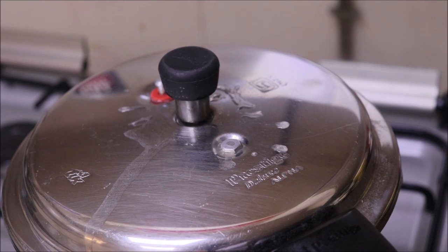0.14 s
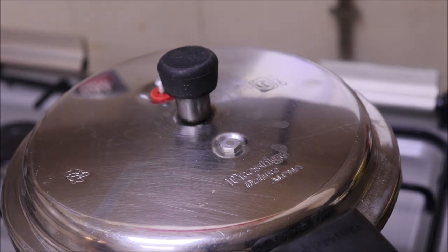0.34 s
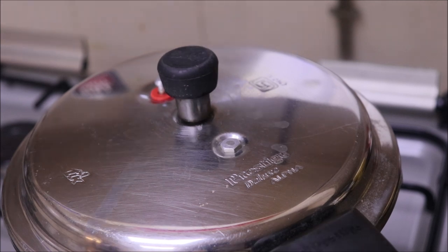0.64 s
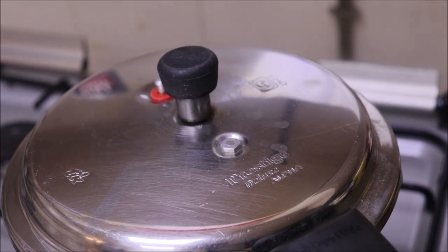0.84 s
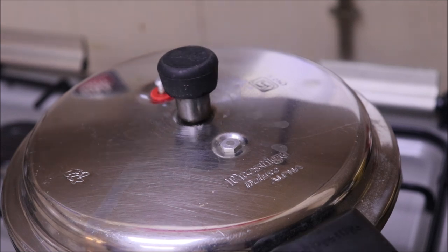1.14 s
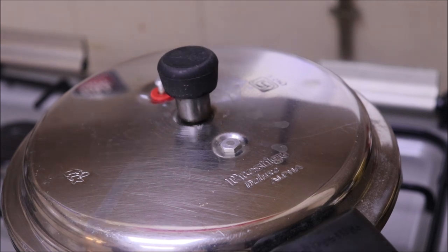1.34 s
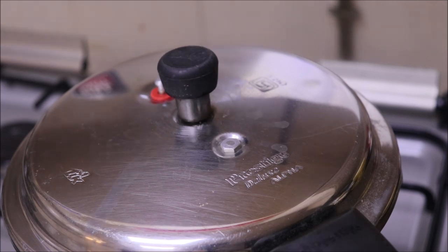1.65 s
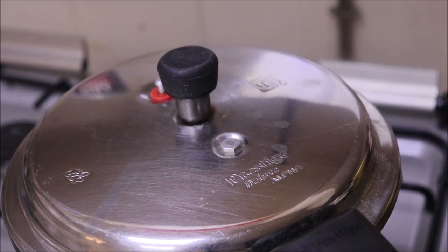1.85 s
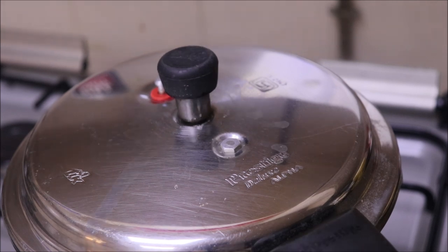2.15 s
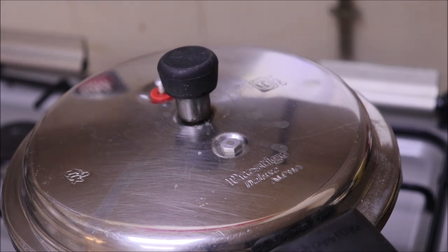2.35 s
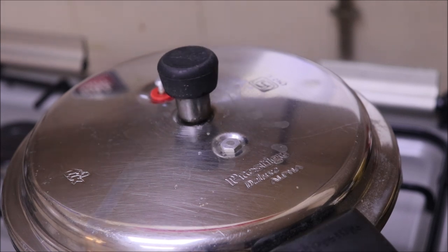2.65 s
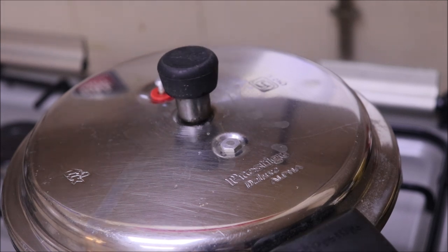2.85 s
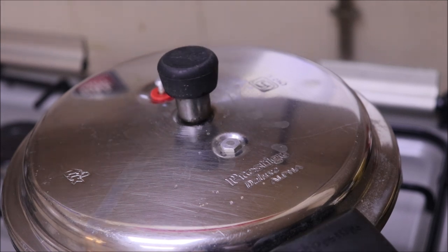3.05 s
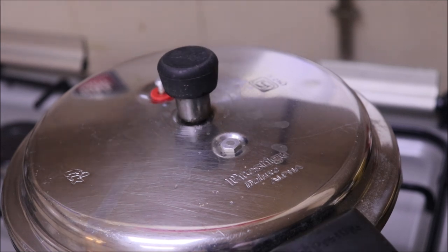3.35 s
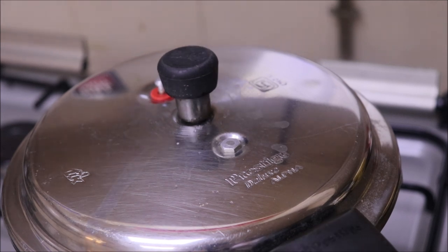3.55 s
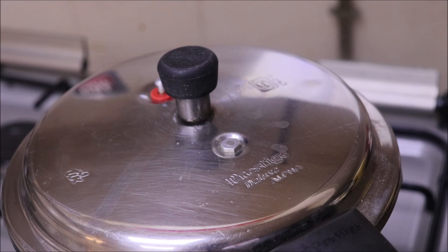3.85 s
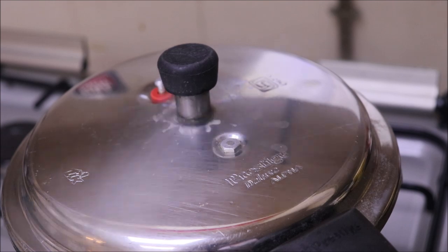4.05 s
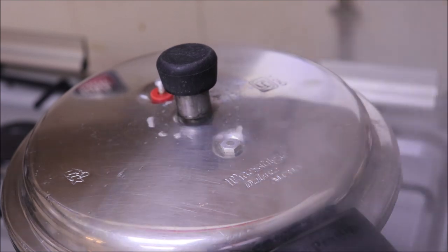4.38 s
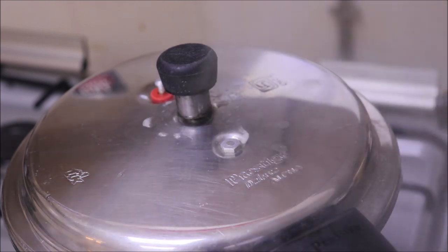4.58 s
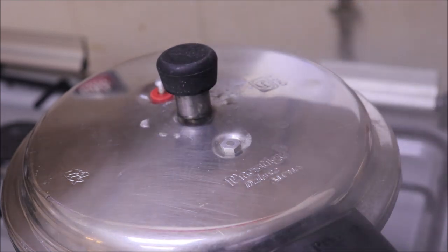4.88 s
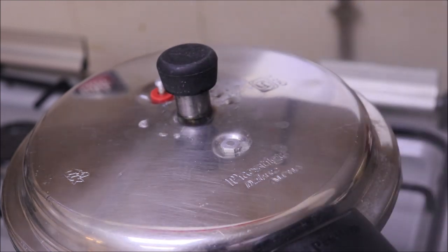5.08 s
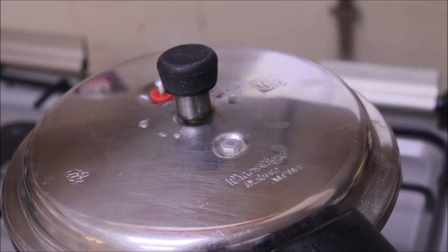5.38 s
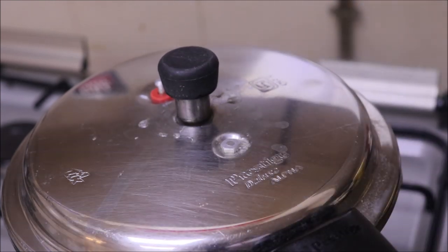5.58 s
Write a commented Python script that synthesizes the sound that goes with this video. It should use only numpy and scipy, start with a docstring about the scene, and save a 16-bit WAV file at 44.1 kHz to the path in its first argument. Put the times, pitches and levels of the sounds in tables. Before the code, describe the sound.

A gas burner rumbles quietly under a pressure cooker, with a faint hum and a thin seep of steam, heard close up in stereo in a small kitchen. At about 0.4 seconds a sharp, high hiss breaks out from the valve. It flutters rapidly as the weight rocks, lightly until 1.3 seconds, again from 2.2, and most strongly between 3 and 4 seconds, with brief swells. At 4 seconds the weight lifts with a small knock and a soft puff, water sputters, and the hiss opens into a much louder, broader jet that covers the burner. From about 4.3 seconds a breathy, high whistle wavers inside the rush, drifting upward. Near 5.5 seconds the hiss surges once more and the weight drops back with two quick metallic knocks that briefly ring the lid. The steam dies away at once.

```python
"""A small kitchen, with a stereo microphone close to a pressure cooker on a gas stove.
Over the rumble of the burner, steam first seeps, then hisses hard past the rocking weight valve.
The weight lifts, the vent spits and blows a full, half-whistling jet, then the weight drops back
and rings the lid. The jet is so loud that gain control pushes the burner away until it ends."""
import sys
import numpy as np
from scipy import signal
from scipy.fft import rfft, irfft
from scipy.io import wavfile
from scipy.ndimage import uniform_filter1d

SR = 44100
rng = np.random.default_rng(int(sys.argv[2]) if len(sys.argv) > 2 else 0)


def dump(signal):
    """Clip the signal to [-1, 1] and save it as 16-bit WAV at the path in sys.argv[1]."""
    limited = np.clip(np.atleast_2d(signal).T, -1, 1)
    pcm = np.round(limited * 32767).astype(np.int16)
    wavfile.write(sys.argv[1], SR, pcm)


N = 252252
TIME, FREQ = np.arange(N) / SR, np.fft.rfftfreq(N, 1 / SR)
# the hiss breaks out; the weight lifts, drops and sits again
HISS_S, LIFT_S, DROP_S, SEAT_S = 0.3912, 3.985, 5.478, 5.535


def gain_of(db):
    """Decibels as a factor."""
    return 10 ** (np.asarray(db) / 20)


def unit_rms(x):
    """Scales x to rms 1."""
    return x / np.sqrt(np.mean(x ** 2) + 1e-20)


def curve(points, hz=FREQ):
    """Interpolates a table along log frequency."""
    point_hz, value = np.transpose(points)
    return np.interp(np.log(hz + 1), np.log(point_hz + 1), value)


def coloured(x, colour, modes=()):
    """Passes x through a broad colour with resonances on it; comes out at rms 1."""
    lift_db = sum(db / (1 + (2 * (FREQ - hz) / width) ** 2) for hz, width, db in modes)
    return unit_rms(irfft(rfft(x) * gain_of(curve(colour) + lift_db), N))


def turbulence(count=3):
    """Unrelated eddies: by default the core of a plume and its two flanks."""
    return rng.standard_normal((count, N))


def wander(rate_hz):
    """Random drift of rms 1, up to about the given rate."""
    return unit_rms(irfft(rfft(rng.standard_normal(N)) / (1 + (FREQ / rate_hz) ** 4), N))


def droplets(per_s, spread_db):
    """Sparse clicks of uneven size."""
    size = gain_of(spread_db * np.minimum(rng.exponential(1, N), 4))
    return unit_rms(size * rng.choice([-1, 1], N) * (rng.random(N) < per_s / SR))


def swell(peak_s, db, rise_s, fall_s):
    """A gain that rises to one peak and falls away."""
    away = np.maximum((peak_s - TIME) / rise_s, (TIME - peak_s) / fall_s)
    return gain_of(db) * np.exp(-away ** 1.8)


def release(start_s, db_per_s):
    """A gain that holds until start_s and then fades evenly."""
    return gain_of(-db_per_s * np.maximum(TIME - start_s, 0))


# rumble of the burner under the pot: freq_hz, relative_db
BURNER_COLOUR = [(15, -24), (35, -8), (85, -2.5), (170, -5), (215, -2.5), (268, 0), (315, -8), (400, -4.5),
                 (600, -7), (750, -5.5), (1100, -5), (1500, 0.5), (1800, -12), (4000, -52)]
# mains hum in the kitchen, centred between the channels: pitch_hz, level_db
MAINS_HUM = [(100.5, -74), (199.6, -64)]
def stove(burner_db=-51, width=0.37, flicker_db=0.5):
    """The flame and the boiling pot rumble steadily over a faint hum."""
    mid, side = coloured(turbulence(count=2), BURNER_COLOUR)
    flame = (mid + width * np.array([side, -side])) * gain_of(burner_db + flicker_db * wander(12))
    hum = sum(gain_of(db) * np.sqrt(2) * np.sin(2 * np.pi * hz * TIME + 0.9 * wander(11))
              for hz, db in MAINS_HUM)
    return flame + hum


# the seeping valve from close by: freq_hz, relative_db
SEEP_COLOUR = [(400, -27), (2000, -6), (3000, -3), (5000, -3), (6000, -1), (7500, -2), (9500, -6),
               (10500, -1.5), (12000, -8), (14000, -15), (15000, -9.5)]
def seep(level_db=-45.5):
    """A faint, steady escape of steam, there before the valve starts to hiss."""
    return coloured(turbulence(), SEEP_COLOUR) * gain_of(level_db)


# the hiss at the gap under the weight: freq_hz, relative_db
HISS_COLOUR = [(133, -49), (400, -22), (800, -17.5), (1300, -11.5), (2000, -6.5), (2900, -3.5), (4600, -2),
               (6000, -5.5), (8200, 0.0), (9300, -1.9), (10900, -3), (12700, -12), (14700, -11.5),
               (15500, -16)]
# resonances of the gap and the hollow weight: centre_hz, width_hz, lift_db
GAP_MODES = [(3080, 100, 1.5), (3390, 31, 4.5), (3970, 94, 0.5), (5070, 510, 2), (5370, 86, 4),
             (5850, 820, 7.5), (6340, 625, 7.5), (6340, 73, -5.5), (6760, 210, 5), (7120, 33, 9),
             (7310, 114, 3.5), (7400, 55, 3.0), (7700, 107, 3.5), (7870, 430, 2.5), (10300, 240, 3.5),
             (10900, 55, 3), (11200, 35, -6), (11430, 282, 2.7)]
# surges as the gap opens and the weight shifts, lifts and drops: peak_s, level_db, rise_s, fall_s
SURGES = [(0.394, -26.5, 0.002, 0.015), (0.545, -28, 0.025, 0.025), (1.63, -33.5, 0.1, 0.15),
          (2.95, -25.5, 0.094, 0.2), (3.86, -26, 0.049, 0.088), (4.012, -18.5, 0.014, 0.16),
          (4.14, -11.5, 0.065, 0.1), (5.45, -3, 0.091, 0.036), (5.48, 1.5, 0.017, 0.02)]
def hiss(level_db=-26.0, growth_db_per_s=0.07, attack_s=0.0017, spurt_db=-7, wet=0.21):
    """Steam squeezes past the weight with fine droplets, swelling each time the weight rocks."""
    t = TIME - HISS_S
    strength = gain_of(level_db + growth_db_per_s * t) * np.clip(t / attack_s, 0, 1)
    strength *= release(SEAT_S, db_per_s=118)  # the pressure is spent
    tilt = rocking()
    wet_steam = turbulence() + wet * droplets(per_s=430, spread_db=-0.5)
    steady = coloured(wet_steam, HISS_COLOUR, GAP_MODES) * strength * gain_of(0.5 * tilt)
    # a spurt mostly drives the resonances of the gap, and they follow the tilt most strongly
    spurt_power = (strength * gain_of(spurt_db)) ** 2 + sum(swell(*row) ** 2 for row in SURGES)
    spurt_colour = [(hz, db - 4 * abs(np.log2(hz / 6800))) for hz, db in HISS_COLOUR]
    spurts = coloured(turbulence(), spurt_colour, GAP_MODES) * np.sqrt(spurt_power)
    return steady + spurts * gain_of(5.0 * tilt)


# the low body of a puff, close up: freq_hz, relative_db
PUFF_COLOUR = [(20, -22), (80, -6), (250, -3), (400, -5), (630, 3.5), (780, -25), (2000, -45)]
# puffs at the valve: peak_s, level_db, rise_s, fall_s
PUFFS = [(0.4, -52, 0.0065, 0.046), (3.99, -43, 0.0087, 0.026), (4.12, -51, 0.06, 0.09)]
def puffs():
    """Steam puffs from under the weight as the gap opens and as the weight lifts."""
    return coloured(turbulence(), PUFF_COLOUR) * sum(swell(*row) for row in PUFFS)


# bouts of the weight rocking on its seat: start_s, length_s, strength (0-1)
ROCKING_BOUTS = [(0.522, 0.77, 0.4), (2.22, 0.56, 0.6), (3.013, 0.99, 0.87)]
def rocking(rock_hz=13.6, ease_s=0.06):
    """Tilt of the weight: it rocks at its own steady rate over a slight, irregular wobble."""
    tilt = 0.27 * wander(rate_hz=8.8)
    for start_s, length_s, strength in ROCKING_BOUTS:
        t = TIME - start_s
        bout = np.clip(np.minimum(t, length_s - t) / ease_s, 0, 1)
        tilt += strength * bout * np.sin(2 * np.pi * rock_hz * t)
    return tilt


# the weight striking the vent pipe: start_s, level_db
KNOCKS = [(3.982, -45), (3.997, -41.5), (5.473, -31), (5.521, -26.5), (5.585, -45)]
# the ring of the lid: pitch_hz, relative_db, t60_s
LID_MODES = [(360, -9, 0.073), (540, -7, .06), (585, 1, .1), (618, 1, 0.18), (680, -3, 0.069),
             (1005, -3, .06), (1670, -3, 0.13), (1771, -12, .05)]
def weight_knocks(attack_s=0.0007, chatter_db=-63.5):
    """The weight knocks as it lifts and lands, then chatters on its seat; each blow rings the lid."""
    t = TIME[:SR // 2]
    ring = sum(gain_of(db - 60 * t / t60) * np.sin(2 * np.pi * hz * t) for hz, db, t60 in LID_MODES)
    ring *= 1 - np.exp(-t / attack_s)
    settling = (TIME > SEAT_S) * gain_of(chatter_db) * release(SEAT_S, db_per_s=82)
    blows = droplets(per_s=424, spread_db=1.5) * settling
    for start_s, db in KNOCKS:
        blows[round(start_s * SR)] += gain_of(db)
    return signal.fftconvolve(blows, ring)[:N]


def jet_flow(crack_db=-29, full_db=-2.5, open_s=0.23, creep_db_per_s=2):
    """The flow grows from a crack to full, creeps up while the weight floats and shuts as it drops."""
    t = TIME - LIFT_S
    db = np.interp(t, [0, open_s], [crack_db, full_db]) + creep_db_per_s * np.maximum(t - open_s, 0)
    return (t > 0) * gain_of(db) * release(DROP_S, db_per_s=560)


# the open vent from close by: freq_hz, relative_db
JET_COLOUR = [(133, -48), (400, -39), (700, -31), (1100, -22), (1700, -13.5), (2700, -4), (3800, -0.8),
              (5000, -1.3), (7800, -2.5), (8900, -4), (10000, -1.5), (11700, -1), (13000, -8), (15500, -12)]
# resonances of the gap and the lifted weight: centre_hz, width_hz, lift_db
JET_MODES = [(2380, 51, 1.8), (3860, 36, 2.4), (5430, 47, 2.5), (5360, 40, 2.5), (6000, 390, 2.8),
             (6300, 69, 2.3), (7032, 40, 3), (7480, 94, 4.2), (7500, 71, 3), (7850, 80, 4.5), (8000, 74, 3),
             (8200, 630, 2.6), (8400, 67, 2.5), (9109, 160, 2.6), (9700, 88, 3.2)]
def jet(flutter_db=0.63, wet=0.19):
    """Wet steam rushes from the wide open vent, broader and far louder than the hiss."""
    wet_steam = turbulence() + wet * droplets(per_s=1100, spread_db=3.0)
    rush = coloured(wet_steam, JET_COLOUR, JET_MODES)
    return rush * jet_flow() * gain_of(flutter_db * wander(rate_hz=71))


# water spitting at the vent: freq_hz, relative_db
SPRAY_COLOUR = [(100, -41), (400, -14), (900, -7.5), (1900, 2), (3200, 7.5), (5000, 5), (10000, -25)]
# its single burst: peak_s, level_db, rise_s, fall_s
SPRAY_SWELL = (4.105, -16, 0.09, 0.08)
def spray():
    """Condensed water sputters out as the vent opens."""
    water = droplets(per_s=600, spread_db=2)
    return coloured(turbulence() + water, SPRAY_COLOUR) * swell(*SPRAY_SWELL)


# the whistle wavering as the lifted weight sways: time_s, pitch_hz, level_db (relative to the jet)
WHISTLE_PATH = [(4.3, 3130, -15), (4.43, 3550, -26), (4.53, 3810, -11), (4.63, 3870, -25),
                (4.82, 3520, -14), (4.92, 3810, -23), (5.15, 4060, -18), (5.33, 3950, -17),
                (5.43, 4000, -32)]
def whistle(width_hz=170, waver_hz=35):
    """The jet drives eddies at the lip of the weight, which gather in a narrow, breathy band."""
    time_s, hz, db = np.transpose(WHISTLE_PATH)
    pitch_hz = np.interp(TIME, time_s, hz) + waver_hz * wander(rate_hz=20.9)
    cycles = np.cumsum(pitch_hz) / SR
    eddies = np.array([wander(width_hz) + 1j * wander(width_hz) for _ in range(3)])
    band = unit_rms((eddies * np.exp(2j * np.pi * cycles)).real)
    return band * jet_flow() * gain_of(np.interp(TIME, time_s, db))


def swirled(plume, depth_db, patch_s, patch_hz):
    """The plume sways, so patches of its spectrum swell and fade."""
    spectra = signal.stft(plume, nperseg=512)[2]
    hop_s, bin_hz = 256 / SR, SR / 512
    patches = rng.standard_normal(spectra.shape[1:])
    patches = uniform_filter1d(patches, 1 + int(patch_hz / bin_hz), axis=0)
    patches = uniform_filter1d(patches, 1 + int(patch_s / hop_s), axis=1)
    return signal.istft(spectra * gain_of(depth_db * unit_rms(patches)), nperseg=512)[1][:, :N]


# reverberation of the small kitchen: freq_hz, t60_s
KITCHEN_DECAY = [(200, 0.63), (2000, 0.5), (6500, 0.49), (10000, 0.41), (15000, .25)]
def kitchen(early_db=7.5, early_s=0.021):
    """Echoes at the microphone: strong early ones off lid and wall, then a tail that dies by band."""
    t = np.arange(SR // 2) / SR
    echoes = rng.standard_normal((2, len(t))) * (1 + gain_of(early_db) * np.exp(-t / early_s))
    hz, frame_s, spectra = signal.stft(echoes, SR, nperseg=256)
    spectra *= gain_of(-60 * frame_s / curve(KITCHEN_DECAY, hz)[:, None])
    band_energy = (abs(spectra) ** 2).sum(2, keepdims=True)
    spectra /= np.sqrt(uniform_filter1d(band_energy, size=3, axis=1))
    response = signal.istft(spectra, SR, nperseg=256)[1]
    return response / np.linalg.norm(response, axis=1, keepdims=True)


# power reaching the microphone straight from the valve: freq_hz, share (0-1)
LEAK_DIRECT = [(300, 0.77), (1500, 0.62), (2300, 0.56), (3000, 0.57), (5900, 0.55), (7000, 0.28),
               (8000, 0.6), (9400, 0.25), (15000, 0.06)]
JET_DIRECT = [(300, 1), (1500, 0.71), (2300, 0.46), (3000, 0.71), (5600, 0.46), (7100, 0.21), (8000, 0.22),
              (9000, 0.39), (10000, 0.4), (15000, 0.36)]
# phase between the two microphone ports: freq_hz, left_lead_rad
LEAK_PHASE = [(1500, 0), (5500, .2), (8500, .9), (10000, 1.9), (15000, 2.2)]
JET_PHASE = [(1500, 0), (5500, .2), (8500, .8), (11500, .7), (15000, 1.1)]
# balance between the ports: freq_hz, left_minus_right_db
PORT_BALANCE = [(50, -3), (700, 1), (1500, -1), (2400, -4.5), (3100, -2.5), (4500, -1.8), (8000, -2),
                (12000, -0.5), (15000, 1.2)]
def at_microphone(plume, room, direct, phase):
    """The core of the plume reaches both ports straight; its flanks arrive by way of the room."""
    share = np.clip(curve(direct), .02, .98)
    side = np.array([[.5], [-.5]])
    straight = rfft(plume[0]) * np.exp(1j * side * curve(phase))
    echoes = rfft(signal.fftconvolve(plume[1:], room, axes=1)[:, :N])
    ports = np.sqrt(share) * straight + np.sqrt(1 - share) * echoes
    return irfft(ports * gain_of(side * curve(PORT_BALANCE)), N)


def scene():
    """The leaking valve, the open vent and the weight sound in one kitchen, over the stove."""
    room = kitchen()
    leak = (seep() + hiss()) * gain_of(0.53 * wander(rate_hz=65))  # a slight, fast flutter
    leak = swirled(leak, depth_db=0.88, patch_s=0.07, patch_hz=1100)
    vent = swirled(jet() + spray() + whistle(), depth_db=0.87, patch_s=0.091, patch_hz=500)
    vent += weight_knocks() + puffs()
    return (at_microphone(leak, room, LEAK_DIRECT, LEAK_PHASE)
            + at_microphone(vent, room, JET_DIRECT, JET_PHASE) + stove())


def record(dry, threshold_db=-24.0, ratio=60, recovery_db_per_s=135, attack_s=0.0085, edge_hz=15800):
    """Gain control holds the jet down and recovers quickly after it; a low-pass trims the top."""
    pole = np.exp(-1 / (attack_s * SR))
    smoother = [1 - pole], [1, -pole]
    power_db = 10 * np.log10(signal.lfilter(*smoother, (dry ** 2).mean(0)) + 1e-12)
    recovery_db = TIME * recovery_db_per_s
    held_db = np.maximum.accumulate(power_db + recovery_db) - recovery_db
    over_db = np.maximum(held_db - threshold_db, 0)
    ducked = dry / gain_of((1 - 1 / ratio) * signal.lfilter(*smoother, over_db))
    low_pass = signal.firwin(1023, edge_hz, window=("kaiser", 9), fs=SR)
    return signal.oaconvolve(ducked, low_pass[None], "same")


dry = scene()
out = record(dry)
dump(out)
```